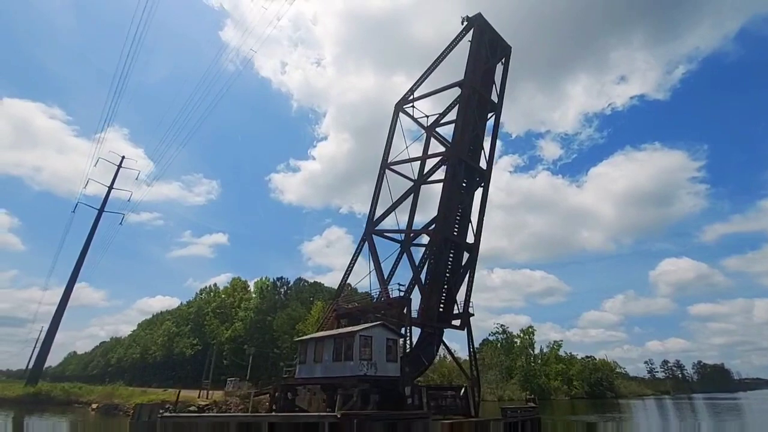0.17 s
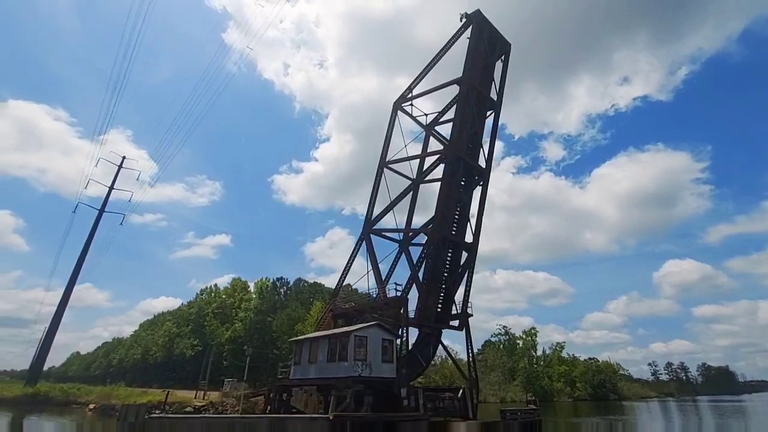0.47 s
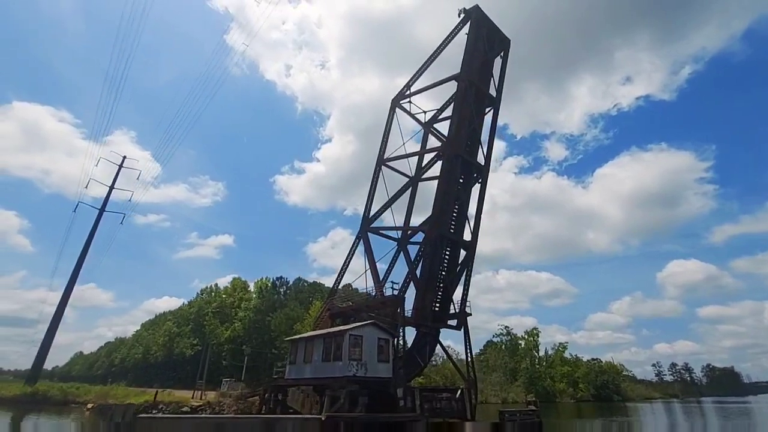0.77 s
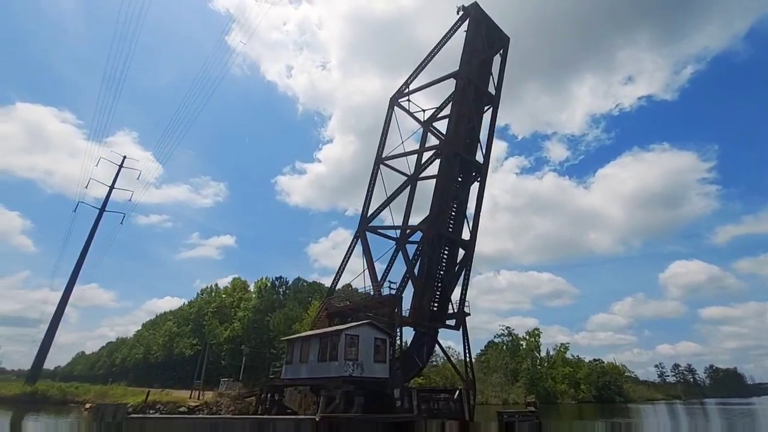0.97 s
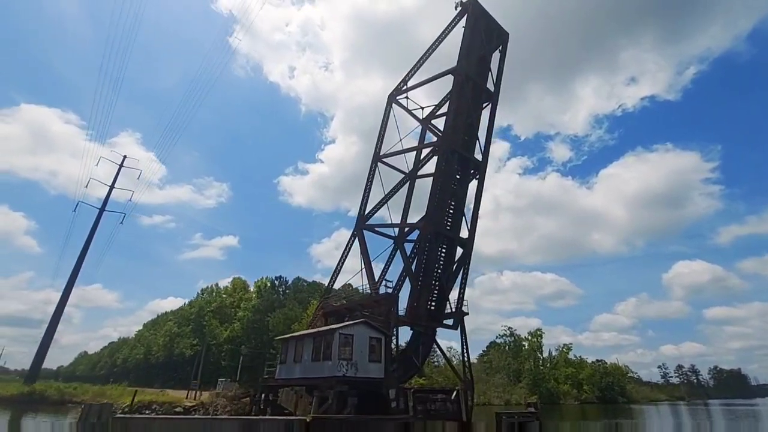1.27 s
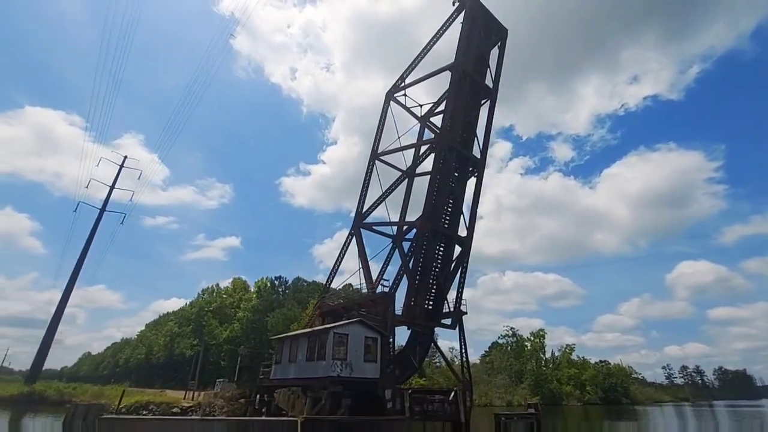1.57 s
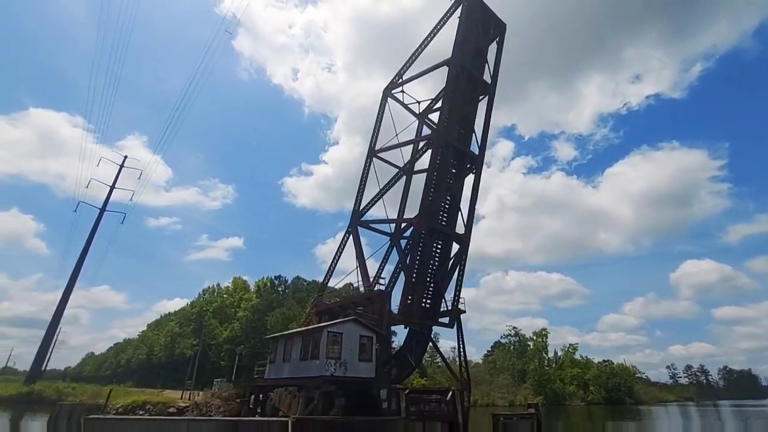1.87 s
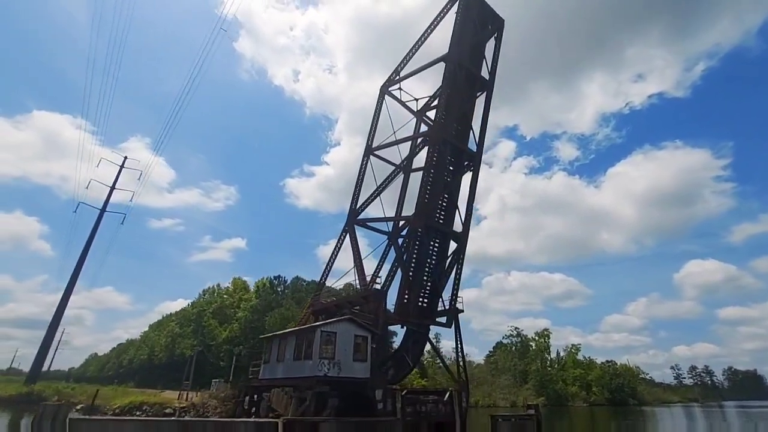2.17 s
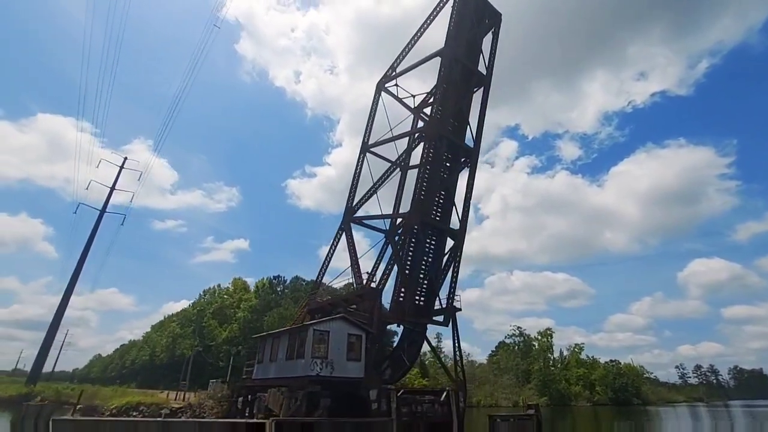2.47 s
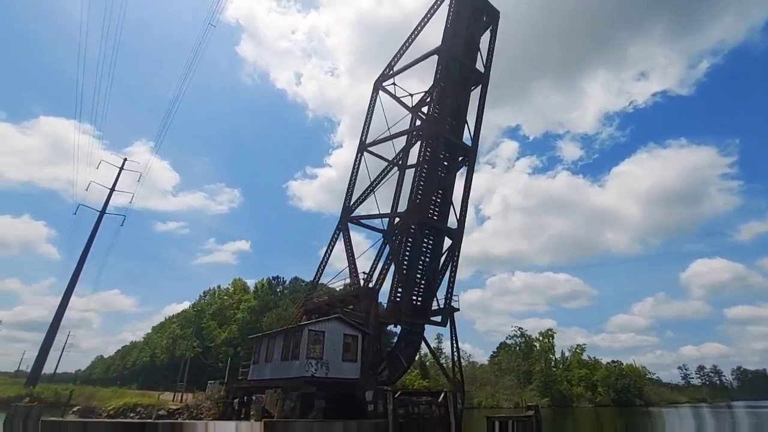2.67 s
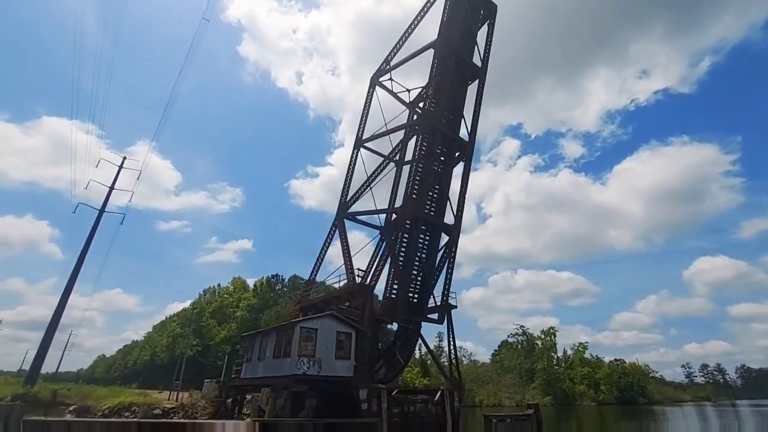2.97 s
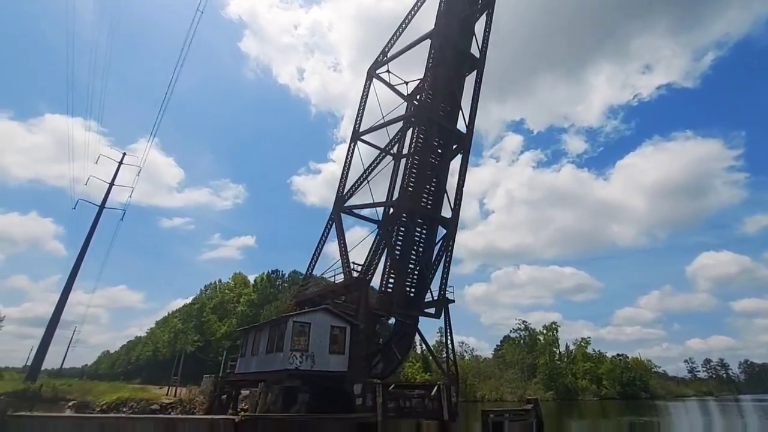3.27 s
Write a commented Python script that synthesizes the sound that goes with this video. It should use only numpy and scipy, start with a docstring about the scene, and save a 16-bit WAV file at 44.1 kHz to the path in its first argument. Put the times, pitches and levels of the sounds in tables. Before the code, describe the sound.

A motorboat's low engine hum and clatter, with water wash and thumping wind on the microphone.

```python
"""A motor boat engine hums, whines and clatters over the wash of water, with a fine fizz of spray.
Wind buffets the microphone, mostly its left port, and bursts hardest near the end; heard from on board.
The hum is made of sine waves, and the clatter is noise pulsing at the engine's firing rate.
Wash, churn and spray are shaped noise, gurgles and droplets are short tones, and wind is bursts of rumble."""
import sys
import numpy as np
from scipy import signal
from scipy.fft import rfft, irfft
from scipy.io import wavfile
from scipy.ndimage import uniform_filter1d

SR = 44100
rng = np.random.default_rng(int(sys.argv[2]) if len(sys.argv) > 2 else 0)


def transcribe(u):
    """Save the signal u as a 16-bit wav file named by the first command-line argument.

    u: samples, shape (n,) or (channels, n), limited to [-1, 1]; the rate is SR.
    q: integer samples, one column per channel.
    """
    v = np.clip(np.atleast_2d(u).T, -1, 1)
    q = np.round(v * 32767).astype(np.int16)
    wavfile.write(sys.argv[1], SR, q)


N = 150822
T = np.arange(N) / SR  # time of each sample in seconds
BINS = np.fft.rfftfreq(N, 1 / SR)  # frequencies in Hz

# Spectrum tables and level curves give relative dB where a sound is scaled afterwards.

# Tones of the engine. Each row: multiple of the firing rate (its pitch is rounded to a whole multiple),
# left level in dB, right level in dB.
ENGINE_TONES = [(1, -40.5, -51), (2, -39, -61.5), (3, -41, -58), (4, -44.5, -54), (5, -52.5, -54.5),
                (7, -60, -68), (8, -70.5, -60), (9, -60.5, -59), (17.8, -55, -80), (22, -56, -77.5),
                (23.3, -57.5, -70.5), (27, -67, -76), (28.2, -71, -80), (30.6, -80, -65),
                (34.38, -71.5, -75.5), (37, -87, -69.5), (45, -77, -73)]
# Tone colour of the clatter. Each row: frequency in Hz, left and right relative dB per Hz.
CLATTER_SPECTRUM = [(300, -1, -13), (980, -2, -7.5), (1390, -17.5, -7.5), (1734, -9, -2), (1930, -1.5, -9),
                    (2147, -20, 4.5), (2365, -8, -0.5), (2476, 0.5, 2.5), (2845, -20.5, -16), (2830, -8, 2),
                    (3320, -30, -8.5), (4080, -25, -34), (8000, -41.5, -41.5)]
# Rise and fall of the clatter. Each row: time in seconds, relative level in dB.
CLATTER_LEVEL_CURVE = [(0, 2.5), (1.2, 1), (1.34, 1), (1.52, 3.5), (1.63, -1.5), (1.82, 0.5), (2.08, -2.5),
                       (2.3, -2), (2.5, 0), (2.82, 1), (3.22, 0), (3.31, -8.5), (3.42, -1)]
# Harder knocks in the clatter. Each row: start in seconds, added strength in dB relative to a typical firing.
HARDER_KNOCKS = [(0.587, -3), (.707, 7), (.966, -4), (1.179, 9), (1.27, 7), (1.333, 9)]
# How alike the noise is at the two ports. Each row: frequency in Hz, likeness (0 unrelated, 1 the same).
PORT_LIKENESS = [(50, 0.62), (600, 0.88), (1200, 0), (2200, 0.97), (3200, 0.58), (5000, 0), (15000, 0.05)]
# Tone colour of water along the hull. Each row: frequency in Hz, left and right relative dB per Hz.
WASH_SPECTRUM = [(20, -15, -26), (70.7, 3.5, 3), (208, 4.5, 2), (400, -2.5, -3.5), (650, -1.5, -5.5),
                 (795, -6, -8), (1090, -10.5, -12.5), (1700, -10, -5), (2750, -12, -14), (3860, -21.5, -18),
                 (4640, -20, -14), (5780, -24, -11.5), (6820, -23, -22), (7560, -22, -21.5),
                 (9100, -33.5, -41.5), (11000, -34, -41.5), (15500, -32.5, -54)]
# Rise and fall of the wash. Each row: time in seconds, relative level in dB.
WASH_LEVEL_CURVE = [(0, 0), (.2, -0.5), (.62, 1.5), (.9, -.5), (1.28, 1), (1.63, -1), (2, -1), (2.2, .5),
                    (2.8, 0.5), (3.05, 2), (3.42, -1)]
# Tone colour of the low wake churn. Each row: frequency in Hz, left and right relative dB per Hz.
CHURN_SPECTRUM = [(150, -14, -20), (380, -2, 0.5), (610, 2, -2), (810, -3, -3.5), (1180, -7, -7.5),
                  (1710, -14.5, -12), (3000, -38, -32), (9000, -59.5, -62)]
# Rise and fall of the churn. Each row: time in seconds, level in dB.
CHURN_LEVEL_CURVE = [(0, -50.5), (.6, -51.5), (.9, -53.5), (1.25, -49.5), (1.7, -52.5), (2.4, -54.5),
                     (3.42, -59.5)]
# Tone colour of the spray. Each row: frequency in Hz, left and right relative dB per Hz.
SPRAY_SPECTRUM = [(2000, -26, -25), (7000, -6, -4.5), (9300, -6.5, -12), (12500, 0.5, -25),
                  (15500, -6, -26)]
# Rise and fall of the spray. Each row: time in seconds, level in dB before SPRAY_GAIN_DB is added.
SPRAY_LEVEL_CURVE = [(0.03, -74), (0.07, -80), (0.24, -85), (0.69, -74), (0.94, -81), (1.08, -73.5),
                     (1.31, -86), (2.57, -75), (2.84, -86), (2.96, -75), (3.19, -81), (3.2, -71.5),
                     (3.32, -76.5), (3.42, -72)]
# Tone colour of wind rumble. Each row: multiple of the eddy rate, relative dB per Hz.
RUMBLE_SPECTRUM = [(.12, -39), (.3, -23.5), (.52, -3.5), (.9, 1.5), (1.4, 0), (2.1, -13), (3.2, -21),
                   (4.8, -31), (7.5, -57), (13, -68), (45, -100)]
# Gusts on the left port. Each row: centre in seconds, length in seconds, level in dB, eddy rate in Hz.
LEFT_GUSTS = [(.025, 0.02, -21.5, 86), (.11, .06, -25.5, 101), (.372, 0.05, -15, 94),
              (.512, .015, -18.5, 116), (.538, 0.044, -17, 61), (.64, 0.016, -23.5, 88.5),
              (.71, 0.021, -19.5, 100), (.895, 0.046, -21, 81.5), (.955, 0.023, -24, 87),
              (1.022, 0.037, -23, 79.6), (1.06, 0.054, -27.5, 76.6), (1.298, 0.027, -21, 132),
              (1.322, 0.011, -12.5, 75), (1.42, 0.026, -21, 79), (1.475, 0.04, -20.5, 87),
              (1.511, 0.0077, -18.5, 162), (1.562, 0.041, -13.5, 96), (1.77, 0.033, -25.5, 91),
              (1.94, 0.014, -21, 87), (2.12, 0.02, -28, 140), (2.28, 0.07, -26.5, 71),
              (2.395, 0.049, -19.5, 91.5), (2.712, 0.031, -22.5, 118), (2.752, 0.014, -12, 59),
              (3.07, .09, -27.5, 111), (3.155, 0.031, -8.5, 112), (3.19, 0.042, -24, 109.5),
              (3.231, 0.0094, -15, 160), (3.25, 0.016, -10.5, 70), (3.29, 0.024, -19, 87.5),
              (3.332, 0.043, -19, 127), (3.372, 0.019, -14, 80), (3.42, 0.033, -17.5, 108)]
# Gusts on the right port. Each row: centre in seconds, length in seconds, level in dB, eddy rate in Hz.
RIGHT_GUSTS = [(.58, 0.095, -47, 110), (1.22, 0.1, -43.5, 110), (2.23, 0.085, -51, 90),
               (2.99, 0.027, -34, 118), (3.075, 0.11, -33, 110), (3.09, 0.14, -36, 317),
               (3.21, .05, -32, 153), (3.22, 0.052, -34, 314), (3.32, 0.042, -35.5, 240)]
# Faint chirps and gurgles. Each row: centre in seconds, length in seconds, pitch at the centre in Hz,
# level in dB, rise per second (as an exponential growth rate).
GURGLE_TONES = [(0.063, 0.0458, 1197, -53, 15), (0.241, 0.058, 517, -46, 0.33),
                (1.21, .06, 480.5, -57, 0.89)]
# Close droplets. Each row: start in seconds, ring frequency in Hz, left level in dB before the soft start,
# decay time in seconds.
CLOSE_DROPLETS = [(.438, 12500, -38, .0003), (.794, 6500, -36, 0.0005), (0.795, 7280, -30.5, .0009),
                  (1.712, 14500, -34, .0002), (2.085, 7200, -43, .001), (2.6, 14800, -37, .0003),
                  (3.083, 11000, -35, .0002)]

FIRING_HZ, SPEED_WANDER = 65.56, 0.001055  # wander is a fraction of the firing rate
RIGHT_LAG_S = 0.00033
PHASE_WAVER_RAD, TONE_WAVER_DB, WHINE_ROUGHNESS = 0.26, 2, 0.47
CLATTER_DB, RATTLE_DB = -50, 0.92  # base level and random swing
KNOCK_DECAY_TURNS = 0.38  # in firing periods
KNOCK_SPREAD_DB, KNOCK_FLOOR, HARD_DECAY_S = 2.5, 0.54, 0.0067
WASH_DB, WASH_PATCH_DB, WASH_SWELL_DB = -46, 1.5, 0.68
SPRAY_GAIN_DB, DROPS_PER_S = 9, 900
DROP_SPREAD_DB, DROP_DB = 8, -5  # drop level is relative to the fizz, before colouring
BREEZE_DB, BREEZE_FLUTTER_DB, BREEZE_EDDY_HZ = -32.5, 2.5, 81
STEADY_S, PRESSURE_SKEW = 0.027, 0.069  # strength-evening window, lopsidedness
RISE_EDGE, FALL_EDGE = 3.16, 2.43  # larger values make a gust start or end more abruptly
GURGLE_ROUGHNESS_RAD = 0.23
TICK_RISE_S, TICK_RIGHT_DB = 0.0001, -16.5  # right level is relative to the left
LOW_CUT_HZ, EDGE_HZ = 43, 15800


def amp(db):
    """Turn decibels into gain."""
    return 10 ** (np.asarray(db) / 20)


def unit(x):
    """Scale a signal to an average (rms) strength of 1."""
    return x / np.sqrt(np.mean(x ** 2) + 1e-20)


def curve(points):
    """Read a time curve at every sample."""
    return np.interp(T, *np.transpose(points))


def spectrum(points, hz):
    """Read each column of a table along a log-frequency axis."""
    table_hz, *columns = np.transpose(points)
    return np.array([np.interp(np.log(hz + 1), np.log(table_hz + 1), c) for c in columns])


def colour(x, points):
    """Filter each port to its own spectrum."""
    return irfft(rfft(x) * amp(spectrum(points, BINS)), N)


def drift(rate_hz):
    """Make slow random motion of rms 1 by keeping only low frequencies of noise."""
    low_pass = np.exp(-(BINS / rate_hz) ** 2) * (BINS > 0)
    return unit(irfft(rfft(rng.standard_normal(N)) * low_pass, N))


def port_noise():
    """Make partly alike noise at two ports; the shared part reaches the right one later."""
    left, other = rfft(rng.standard_normal((2, N)))
    likeness = spectrum(PORT_LIKENESS, BINS)[0]
    right = likeness * left + np.sqrt(1 - likeness ** 2) * other
    delay = np.exp(-2j * np.pi * BINS * RIGHT_LAG_S)
    return irfft(np.array([left, right * delay]), N)


def hum(turns):
    """Add the drone and whine: wavering multiples of the firing rate, rougher towards the top."""
    out = np.zeros((2, N))
    for multiple, left_db, right_db in ENGINE_TONES:
        phase = 2 * np.pi * (round(multiple) * turns + rng.random())
        phase = phase + PHASE_WAVER_RAD * drift(9.8)
        rough = 1 + WHINE_ROUGHNESS * min(multiple / 20, 1) * drift(51)
        right_lag = 2 * np.pi * multiple * FIRING_HZ * RIGHT_LAG_S
        for port, (db, lag) in enumerate([(left_db, 0), (right_db, right_lag)]):
            strength = unit(rough * amp(TONE_WAVER_DB * drift(8.9)))
            out[port] += np.sqrt(2) * amp(db) * strength * np.sin(phase - lag)
    return out


def clatter(turns):
    """Let each firing set off a burst of noise in the engine's resonances; a few knock harder."""
    firing_strengths = amp(KNOCK_SPREAD_DB * rng.standard_normal(1000))
    strength = firing_strengths[turns.astype(int)]
    knocks = KNOCK_FLOOR + strength * np.exp(-(turns % 1) / KNOCK_DECAY_TURNS)
    for start, db in HARDER_KNOCKS:
        knocks += amp(db) * (T > start) * np.exp(-abs(T - start) / HARD_DECAY_S)
    level_db = CLATTER_DB + curve(CLATTER_LEVEL_CURVE) + RATTLE_DB * drift(9.9)
    return unit(colour(port_noise() * knocks, CLATTER_SPECTRUM)) * amp(level_db)


def wash():
    """Make churning water from noise whose short patches of time and pitch come and go."""
    pieces = signal.stft(port_noise(), nperseg=512, noverlap=384)[2]
    patches = rng.standard_normal(pieces.shape[1:])
    patches = uniform_filter1d(patches, size=7, axis=0)  # smooth over frequency
    patches = unit(uniform_filter1d(patches, size=16, axis=1))  # smooth over time
    pieces = pieces * amp(WASH_PATCH_DB * patches)
    water = signal.istft(pieces, nperseg=512, noverlap=384)[1][:, :N]
    level_db = WASH_DB + curve(WASH_LEVEL_CURVE) + WASH_SWELL_DB * drift(27)
    return unit(colour(water, WASH_SPECTRUM)) * amp(level_db)


def churn():
    """Make the lower slosh of the wake from shaped noise, which eases off towards the end."""
    return unit(colour(port_noise(), CHURN_SPECTRUM)) * amp(curve(CHURN_LEVEL_CURVE))


def spray():
    """Make a swelling fizz of noise with tiny bursting drops as random clicks in it."""
    size = amp(DROP_SPREAD_DB * np.minimum(rng.exponential(1, (2, N)), 5))
    bursts = rng.random((2, N)) < DROPS_PER_S / SR
    drops = size * bursts * rng.choice([-1, 1], (2, N))
    fizz = rng.standard_normal((2, N)) + amp(DROP_DB) * unit(drops)
    return unit(colour(fizz, SPRAY_SPECTRUM)) * amp(SPRAY_GAIN_DB + curve(SPRAY_LEVEL_CURVE))


def eddies(rate_hz, size):
    """Make lopsided pressure swings of even strength, as eddies cross a port."""
    ratio = np.fft.rfftfreq(size, 1 / SR) / rate_hz
    rumble = irfft(rfft(rng.standard_normal(size)) * amp(spectrum(RUMBLE_SPECTRUM, ratio)[0]), size)
    power = abs(signal.hilbert(rumble)) ** 2 / 2
    span = max(int(STEADY_S * SR), 1)
    smooth_power = uniform_filter1d(uniform_filter1d(power, span), span // 2 + 1)
    pressure = rumble / np.sqrt(smooth_power)
    return pressure + PRESSURE_SKEW * (pressure ** 2 - 1)


def buffets(gusts, size=16384):
    """Make each gust an abrupt puff of eddies: slow ones thump, quick ones flutter."""
    out = np.zeros(N)
    t = (np.arange(size) - size / 2) / SR  # seconds from the gust's centre
    edge = np.where(t < 0, RISE_EDGE, FALL_EDGE)
    for centre, length, db, rate_hz in gusts:
        envelope = 1 / np.sqrt(1 + abs(2 * t / length) ** (2 * edge))
        puff = eddies(rate_hz, size) * envelope
        out += amp(db) * np.interp(T - centre, t, puff, 0, 0)
    return out


def wind():
    """Send gusts of eddies to each port separately, over a fluttering breeze at the left."""
    flutter = amp(BREEZE_DB + BREEZE_FLUTTER_DB * drift(24))
    breeze = eddies(BREEZE_EDDY_HZ, N) * flutter
    return np.array([breeze + buffets(LEFT_GUSTS), buffets(RIGHT_GUSTS)])


def gurgles():
    """Make short, rough, rising tones, like air pockets in the water."""
    out = np.zeros(N)
    for centre, length, hz, db, rise in GURGLE_TONES:
        pitch = hz * np.exp(rise * np.clip(T - centre, -length, length))
        phase = 2 * np.pi * np.cumsum(pitch) / SR + GURGLE_ROUGHNESS_RAD * drift(60)
        envelope = np.exp(-(2 * (T - centre) / length) ** 2)
        out += amp(db) * envelope * np.sqrt(2) * np.sin(phase)
    return out


def ticks():
    """Let a few droplets close to the left port ring briefly and die away."""
    out = np.zeros(N)
    for start, hz, db, decay in CLOSE_DROPLETS:
        t = np.maximum(T - start, 0)
        envelope = (1 - np.exp(-t / TICK_RISE_S)) * np.exp(-t / decay)
        out += amp(db) * envelope * np.sin(2 * np.pi * hz * t)
    return np.array([out, out * amp(TICK_RIGHT_DB)])


def scene():
    """Add engine, water and wind; hum and clatter share one slightly wandering firing rate."""
    turns = np.cumsum(FIRING_HZ * (1 + SPEED_WANDER * drift(2.56))) / SR  # firings so far
    engine = hum(turns) + clatter(turns)
    water = wash() + churn() + spray()
    return engine + water + wind() + gurgles() + ticks()


def record(dry):
    """Apply the microphone's bass cut, then limit the treble."""
    ratio = np.fft.rfftfreq(2 * N, 1 / SR) / LOW_CUT_HZ
    bass_cut = ratio ** 3 / np.sqrt(1 + ratio ** 6)
    cut = irfft(rfft(dry, 2 * N) * bass_cut)[:, :N]
    treble_limit = signal.firwin(511, EDGE_HZ, window=("kaiser", 9), fs=SR)
    return signal.oaconvolve(cut, treble_limit[None], "same")


dry = scene()
out = record(dry)
transcribe(out)
```